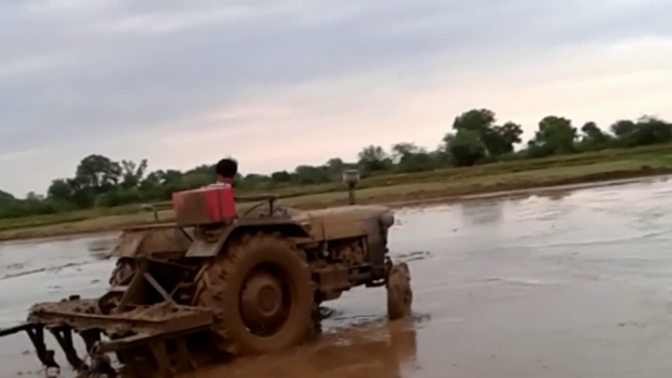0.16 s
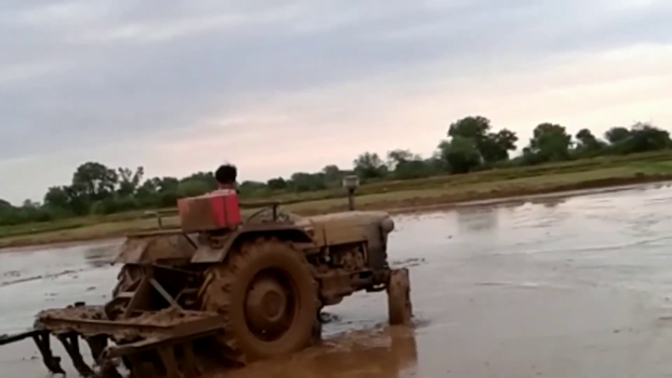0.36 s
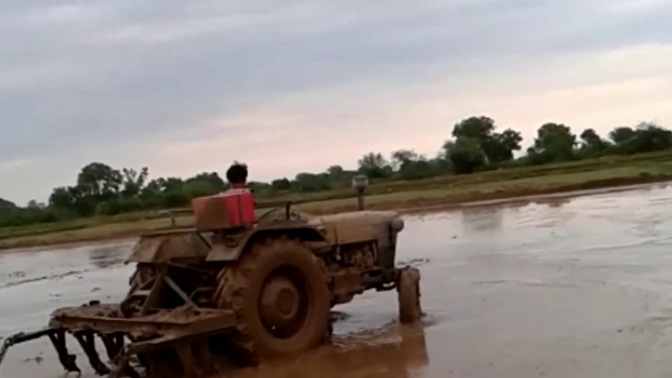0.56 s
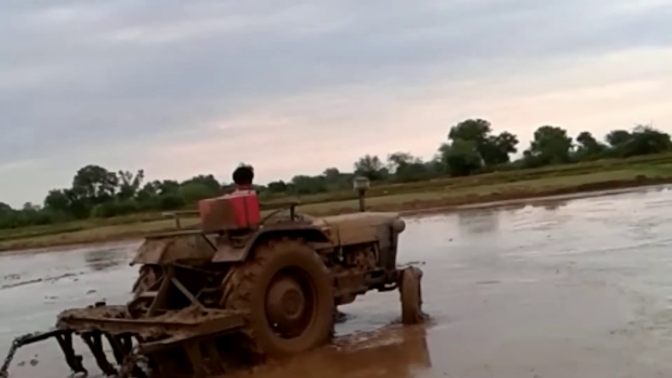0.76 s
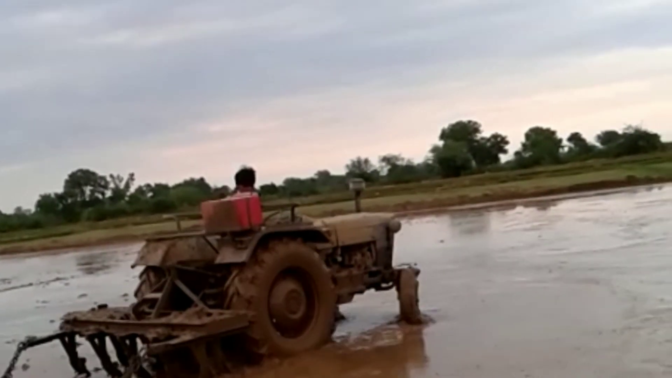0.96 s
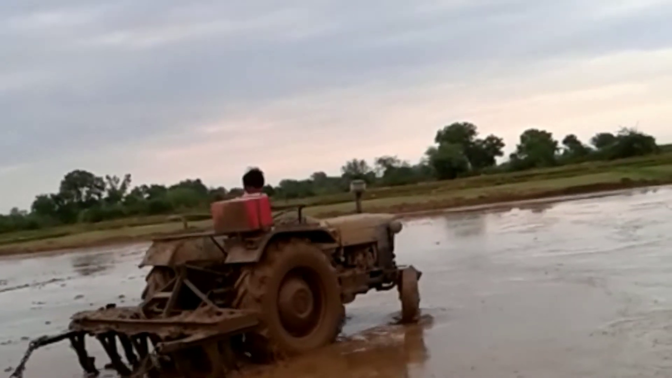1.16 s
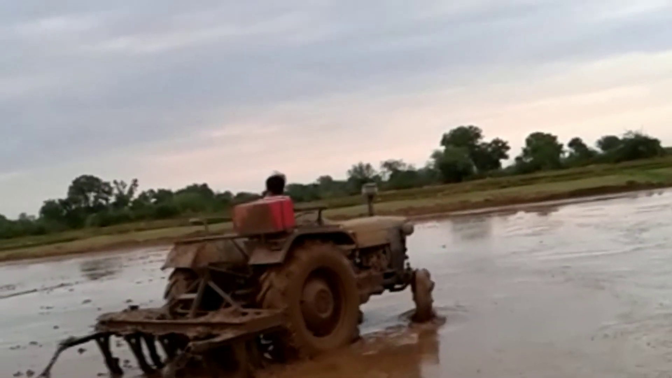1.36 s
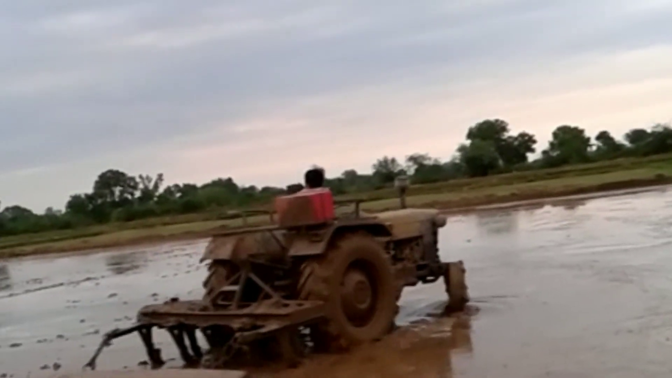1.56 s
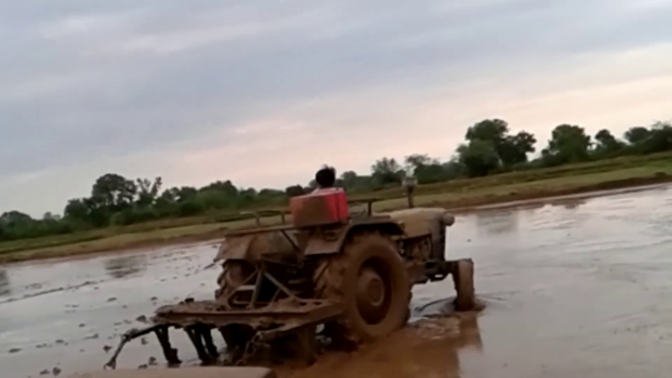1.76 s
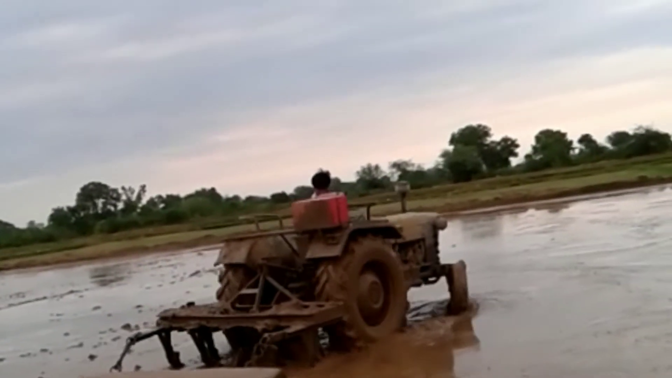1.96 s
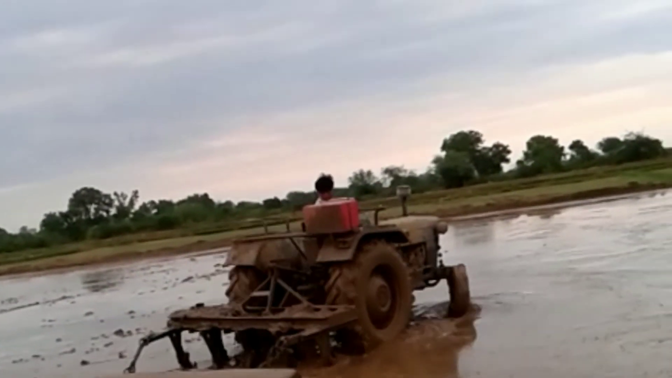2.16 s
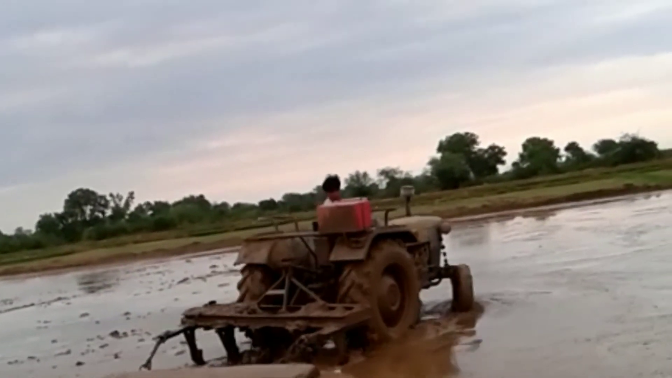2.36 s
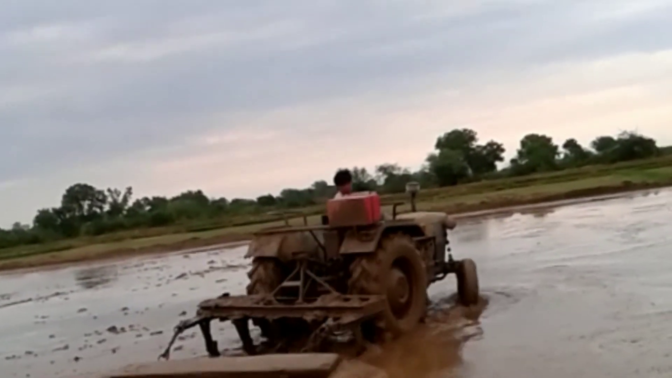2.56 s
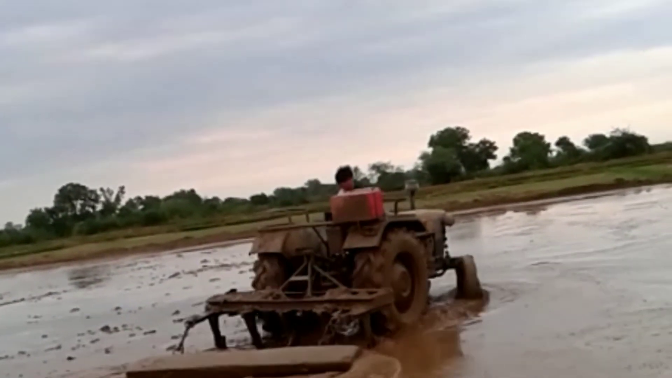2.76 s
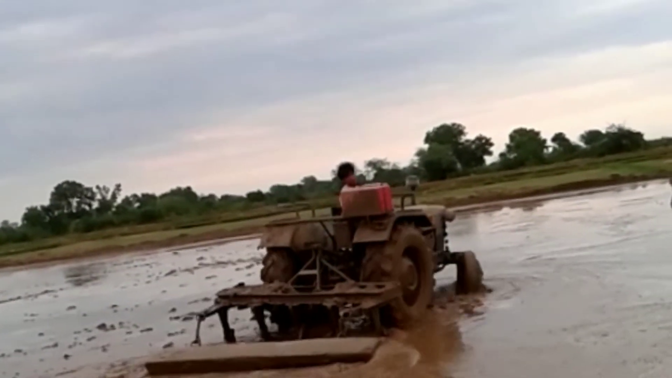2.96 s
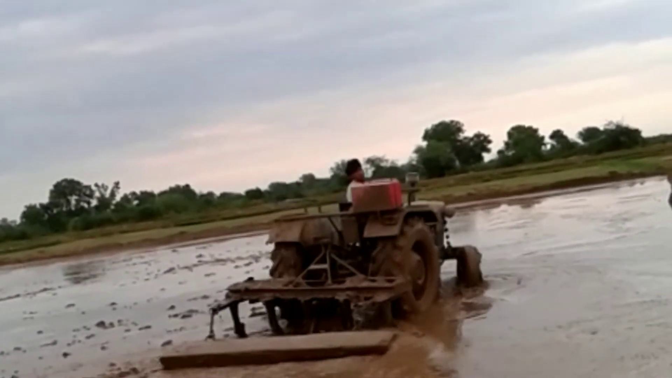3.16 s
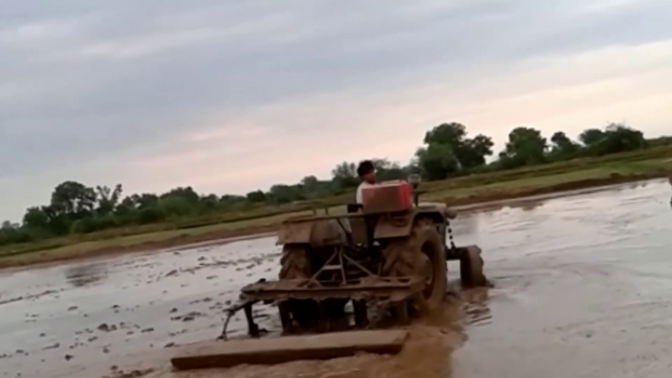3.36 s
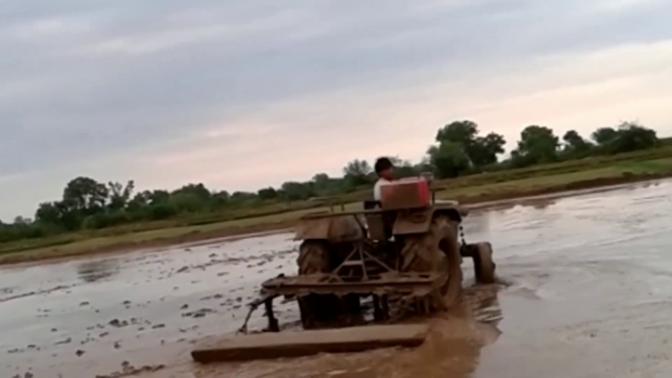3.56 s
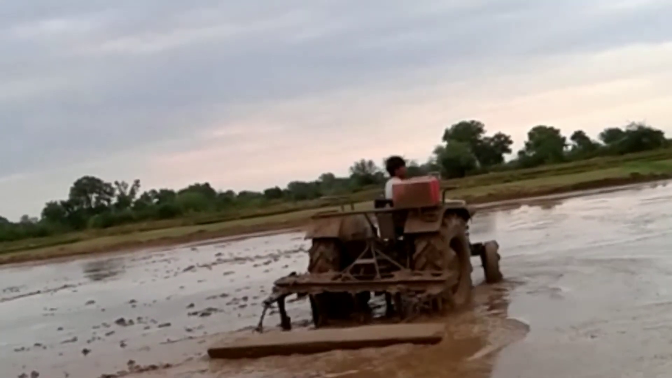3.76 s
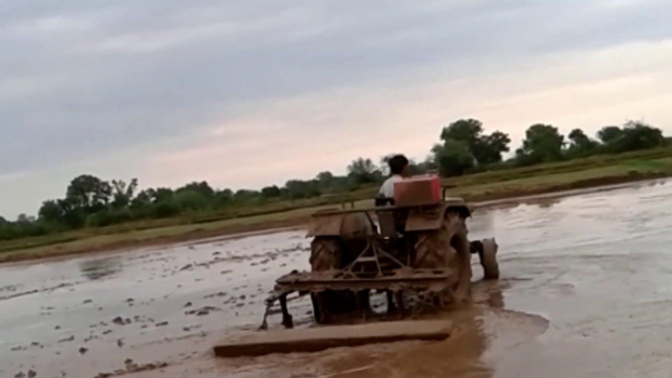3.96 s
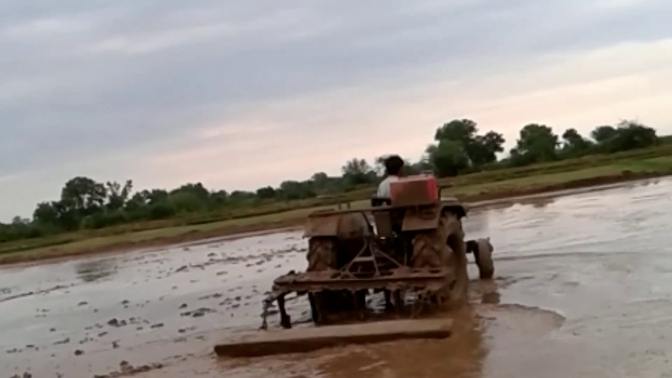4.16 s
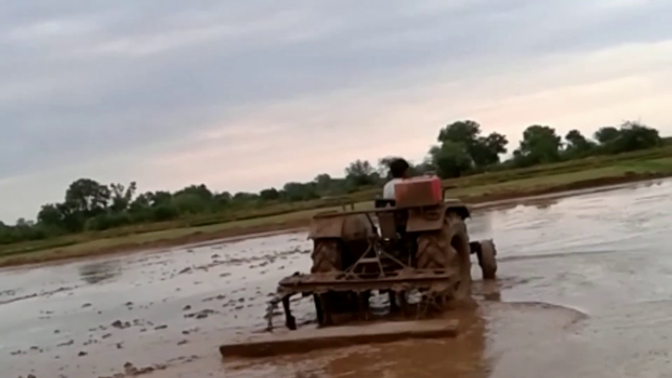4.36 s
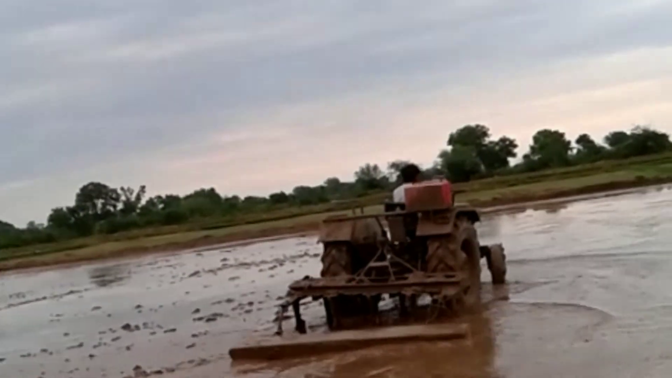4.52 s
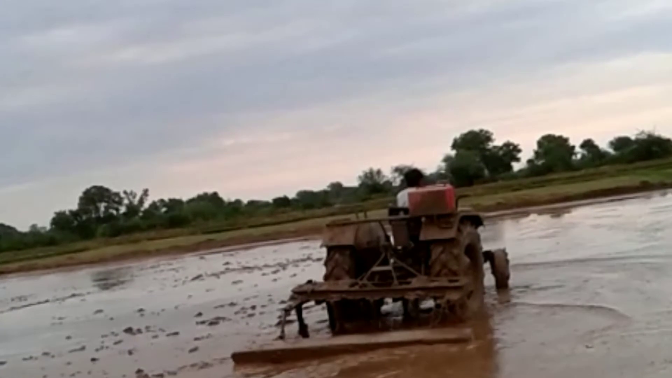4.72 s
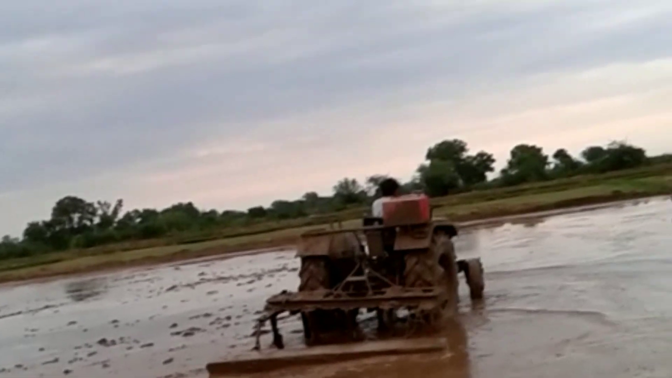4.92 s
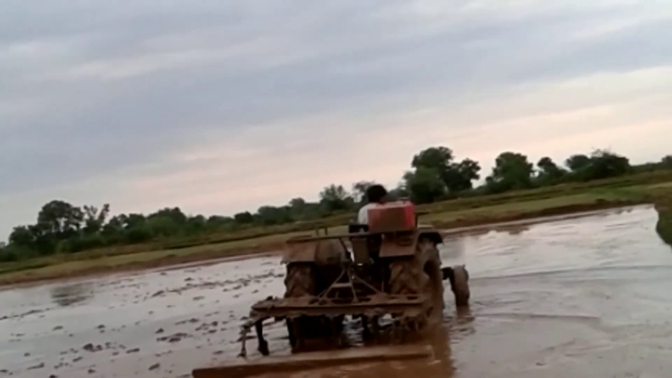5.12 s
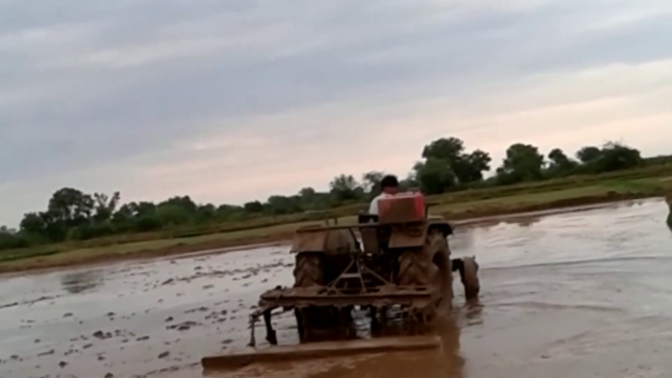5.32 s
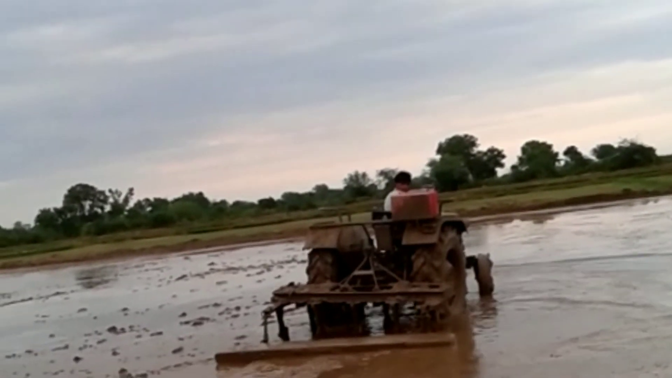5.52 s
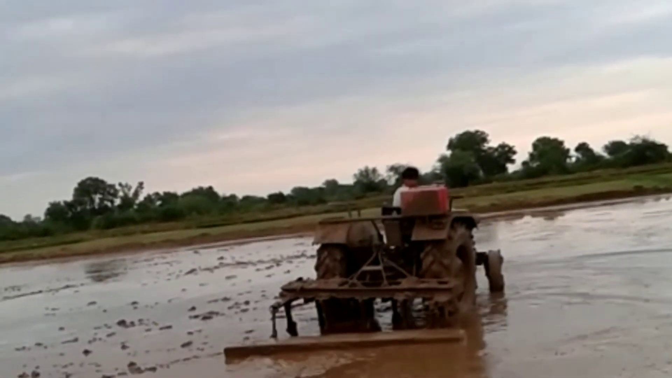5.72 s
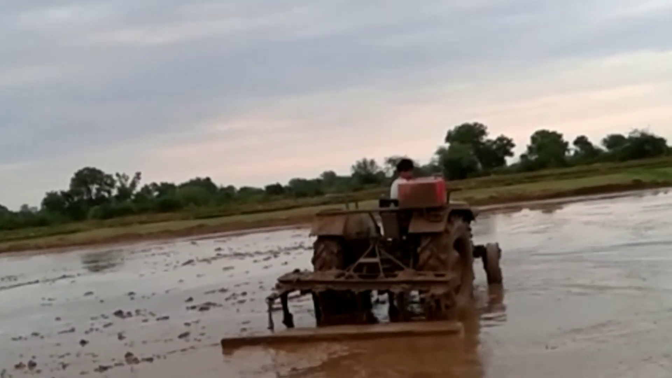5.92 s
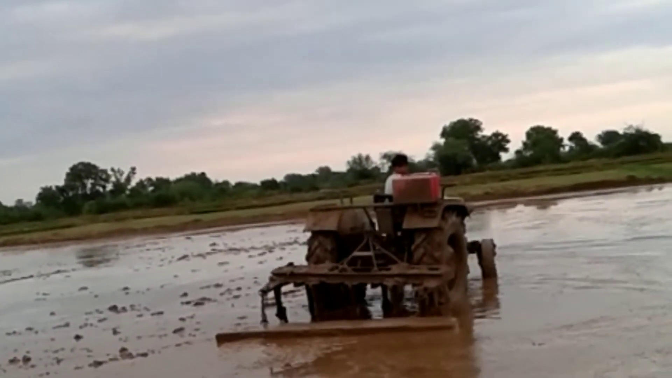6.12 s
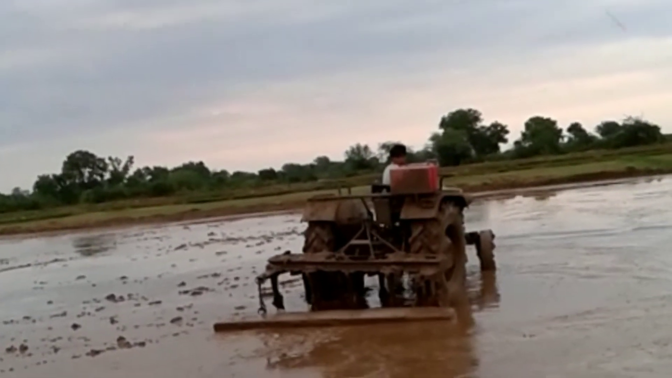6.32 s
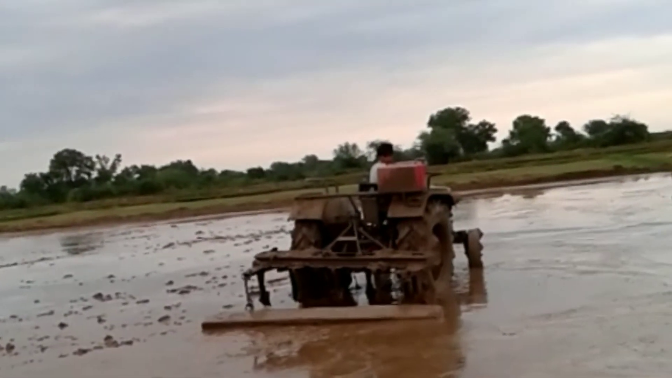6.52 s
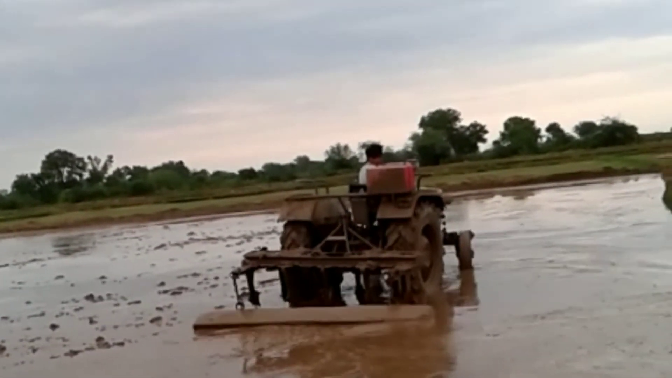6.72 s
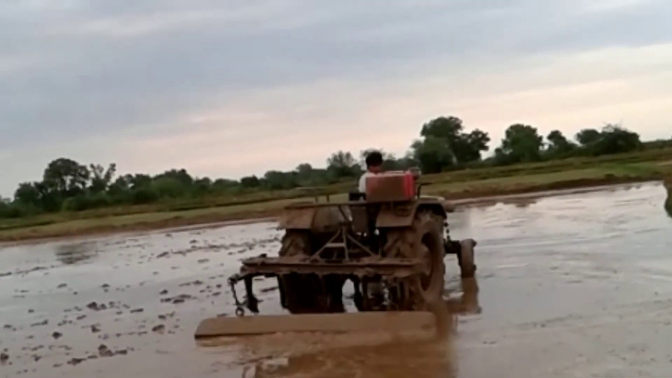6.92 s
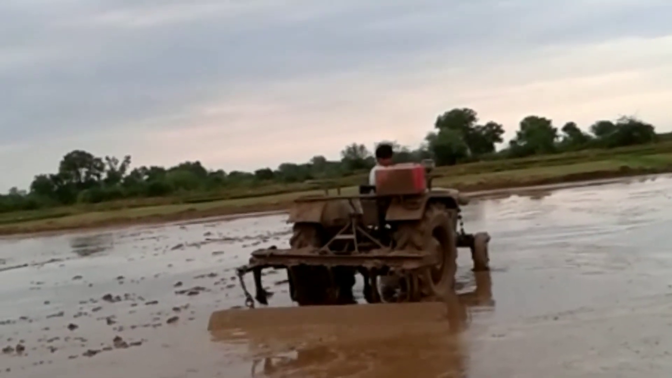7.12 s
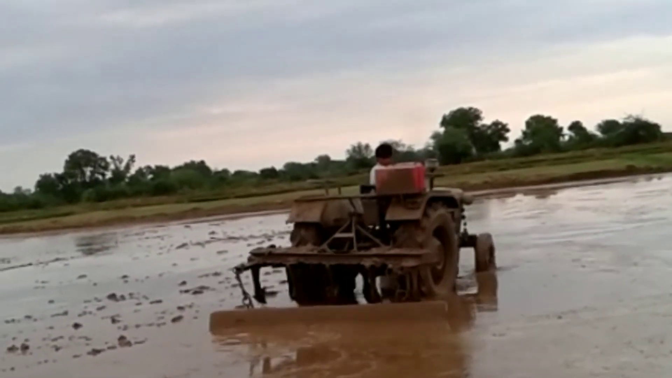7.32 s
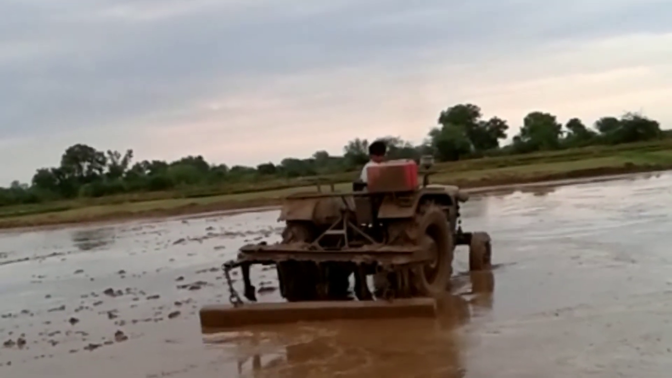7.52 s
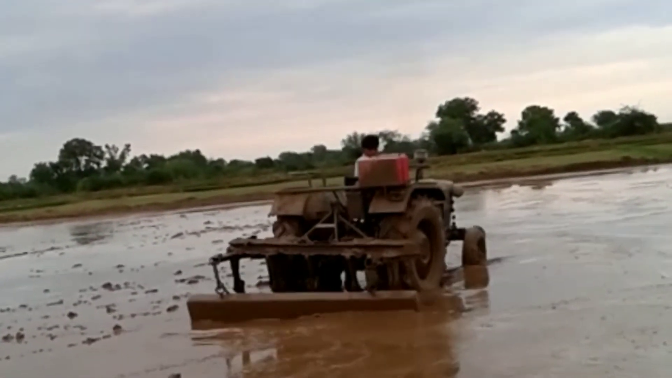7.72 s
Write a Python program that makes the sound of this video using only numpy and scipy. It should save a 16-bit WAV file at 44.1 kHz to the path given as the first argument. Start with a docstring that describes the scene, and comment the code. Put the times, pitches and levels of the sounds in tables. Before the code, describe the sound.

In an open flooded field, one microphone hears a three-cylinder diesel tractor close by. From 0 to 2.5 seconds it knocks hard and unevenly, about 29 beats a second, with deep exhaust thump, metallic clatter and a grainy hiss of muddy spray. A near cricket begins at about 1 second, giving shrill, falling chirps in short runs that become longer later. From 2.5 to 4.8 the tractor turns away: treble dulls, levels drop, knocks weaken and the beat rises to about 33. At 4.8 the throttle shuts; the engine coasts down with a soft drone and loose ticking, while small splashes fall near 4.9, 5.3 and 5.8. Around 6.6 it catches again, with slow, sharp knocks at about 16 a second, swelling near 7, dipping near 7.4 and strengthening to the end at 7.9. Faint low air and distant insects lie behind.

```python
"""Diesel tractor in a flooded field

One microphone in the open: a three-cylinder tractor drags a levelling board away; a cricket chirps close by.
Filtered noise bursts make the knocks: hard under load, then the engine speeds up as the load falls,
coasts down with the throttle shut and catches again in slow, sharp beats. Puffs through resonances make
the exhaust; random taps make the clatter and the muddy spray; gliding sine whistles make the cricket.
Low air and far insects, both filtered noise, lie behind."""
import sys
import numpy as np
from scipy import signal
from scipy.fft import rfft, irfft
from scipy.io import wavfile
from scipy.ndimage import uniform_filter1d

SR = 44100
rng = np.random.default_rng(int(sys.argv[2]) if len(sys.argv) > 2 else 0)


def persist_wave(psi):
    """Save psi, clipped to +-1, as 16-bit WAV."""
    counts = np.round(np.clip(psi, -1, 1) * 32767).astype(np.int16)
    wavfile.write(sys.argv[1], SR, np.atleast_2d(counts).T)


N = 347493
TIME = np.arange(N) / SR


def from_db(db):
    """Decibels to gain."""
    return 10 ** (np.asarray(db) / 20)


def rms_one(x):
    """Scale each row to rms 1."""
    return x / np.sqrt(np.mean(x ** 2, axis=-1, keepdims=True) + 1e-20)


def even_level(x):
    """Hold the short-term rms near 1 whatever the firing rate."""
    power = uniform_filter1d(uniform_filter1d(x ** 2, SR // 4), SR // 8)
    return x / np.sqrt(power + 1e-12)


def in_time(rows):
    """Interpolate the columns of a curve at every sample."""
    times, *columns = np.transpose(rows)
    return [np.interp(TIME, times, column) for column in columns]


def ramp(t, start_s, takes_s):
    """A change from 0 to 1."""
    return np.clip((t - start_s) / takes_s, 0, 1)


def wander(per_s):
    """Random drift, straight between normal draws of spread 1."""
    knots = rng.standard_normal(int(per_s * N / SR) + 2)
    return np.interp(TIME, np.linspace(0, N / SR, len(knots)), knots)


def resonate(x, hz, width):
    """A steep-sided resonance with gain 1 on top."""
    edges = np.clip([hz - width / 2, hz + width / 2], 10, .45 * SR)
    band = signal.butter(2, edges, "band", fs=SR, output="sos")
    return signal.sosfilt(band, x + 1e-18)


def place(times, sounds):
    """Lay short sounds on the time line."""
    out = np.zeros(N)
    for s, sound in zip(times, sounds):
        at = int(np.clip(s * SR, 0, N - 1))
        out[at:at + len(sound)] += sound[:N - at]
    return out


def impacts(per_s, spread_db):
    """Small contacts at random times, of uneven size and either sign."""
    chance = rng.random((int(per_s * N / SR), 3))
    size_db = spread_db * np.minimum(-np.log(1 - chance[:, 1]), 4)
    sizes = from_db(size_db) * np.sign(chance[:, 2] - .5)
    return np.bincount((chance[:, 0] * N).astype(int), sizes, N)


def low_air(hz):
    """Moving air rumbles faintly under everything: noise below a cutoff."""
    low_pass = signal.butter(2, hz, fs=SR, output="sos")
    return rms_one(signal.sosfilt(low_pass, rng.standard_normal(N)))


def far_insects(hz, width):
    """Many distant crickets blur into one shrill band of noise."""
    return rms_one(resonate(rng.standard_normal(N), hz, width))


# the near cricket sings in runs of evenly spaced chirps: first chirp t/s, last chirp t/s
CHIRP_RUNS = [(1.082, 1.152), (1.305, 1.377), (2.259, 2.403), (2.655, 3.119), (3.241, 3.451),
              (3.602, 3.744), (3.876, 4.138), (4.3, 4.432), (4.618, 4.618), (4.73, 5.389), (5.511, 5.841),
              (5.977, 6.892), (6.967, 7.755)]
CHIRP_EVERY_S = .066


def cricket(start_hz, end_hz, stroke_s, gap_s, lead_s):
    """A lone wing stroke opens each run, then two a chirp; each whistle falls as the wing slows."""
    chirps = np.concatenate([np.linspace(first, last, round((last - first) / CHIRP_EVERY_S) + 1)
                             for first, last in CHIRP_RUNS])
    openers = [first - lead_s for first, last in CHIRP_RUNS]
    strokes = np.concatenate([chirps, chirps + gap_s, openers])
    chance = rng.standard_normal((len(strokes), 2))
    along = np.minimum(np.arange(SR // 50) / SR / stroke_s, 1)   # 0 to 1 through a stroke
    hz = (start_hz + (end_hz - start_hz) * along) * (1 + .009 * chance[:, :1])
    whistle = np.sin(2 * np.pi * (np.cumsum(hz, axis=1) / SR + chance[:, 1:]))
    return place(strokes, np.sin(np.pi * along) ** 2 * whistle)


# colour of the spray of muddy water: f/Hz, level/dB
SPRAY = [(3000, -9), (5000, -11), (6200, -6), (7000, 4.5), (8300, 1), (9000, 0.5), (9700, -2),
         (10500, -8.5), (12500, -11), (16000, -22)]


def spray(per_s, spread_db):
    """Fine drops from the wheels and tines merge into a grainy hiss."""
    hz, db = np.transpose(SPRAY)
    bins_hz = np.fft.rfftfreq(N, 1 / SR)
    colour = from_db(np.interp(np.log(bins_hz + 1), np.log(hz), db, left=-90))
    return rms_one(irfft(rfft(impacts(per_s, spread_db)) * colour, N))


# louder splashes behind the wheels: t/s, length/s, level over the spray/dB
SPLASHES = [(4.866, .01, 10), (5.293, .077, 5), (5.822, .03, 5)]


def splashes():
    """Gain of the spray as clods fall back into the water."""
    return from_db(sum(db * np.exp(-((TIME - s) / length) ** 2) for s, length, db in SPLASHES))


def thin_whistle(hz, width):
    """A faint high tone, a little rough: very narrow noise."""
    return rms_one(resonate(rng.standard_normal(N), hz, width))


SLACK_FUEL_DB, SLACK_RANGE_DB = -31, 7   # below this fuel supply the gears run slack, fully so 7 dB lower


def gear_slap(cycle, at, width, hz, width_hz):
    """With little load the gears slap once a firing cycle and ring a resonance of the casing."""
    stroke = np.exp(-((cycle % 1 - at) / width) ** 2)
    return rms_one(resonate(stroke * rng.standard_normal(N), hz, width_hz))


def throb(cycle, depth_db, peak_at):
    """Clatter swells twice a firing cycle, in dB."""
    return depth_db * np.cos(4 * np.pi * (cycle - peak_at))


def clack(cycle, db, at, width):
    """The valve gear clacks once between firings, in dB."""
    return db * np.exp(-((cycle % 1 - at) / width) ** 2)


# resonances of the tractor's frame, engine casing and sheet metal: f/Hz, width/Hz, level/dB
FRAME = [(138, 112, -2), (269, 112, 0.5), (349.7, 53, -1), (416, 29.5, -3.5), (532, 260, -14)]
CASING = [(715, 212, -3.5), (869, 197, 1), (1046, 140, -4), (1337, 223, -5), (1586, 285, 0),
          (1876, 274, -3)]
SHEET_METAL = [(2331, 373, 4), (2576, 200, 1), (3072, 540, -6), (4150, 1400, -17), (6460, 2500, -13.5)]
TICK_SPEED = 20   # firings per s; the valve ticks stand out as the engine slows to this
RUMBLE_FOLLOWS = 0.66   # share of the clatter's swing that reaches the frame


def clatter(modes, force_db, per_s, spread_db):
    """Valves, gears and loose parts tap the resonances of a body."""
    force = from_db(force_db)
    return even_level(sum(from_db(db) * resonate(force * impacts(per_s, spread_db), hz, width)
                          for hz, width, db in modes))


# resonances of the air intake: f/Hz, width/Hz, level/dB
INTAKE = [(77, 18, -2.5), (101.6, 9.3, -1), (151, 36, 1)]


def drone(cycle, speed, waver_db, lag, dispersion):
    """Engine orders swell one after another as they slide through the air intake's resonances."""
    out = 0
    for order in range(3, 8):
        gain = sum(from_db(db) * np.exp(-((order * speed - hz) / width) ** 2) for hz, width, db in INTAKE)
        # the resonances delay each order differently, smearing the strokes into a drone
        turns = order * (cycle - lag) + dispersion * order ** 2
        out = out + gain / order * from_db(waver_db * wander(7.2)) * np.sin(2 * np.pi * turns)
    return even_level(out)


# resonances of the exhaust silencer: f/Hz, width/Hz, level/dB
SILENCER = [(66, 7, -9), (83.2, 18, 1.5), (110.2, 28, -3), (154.8, 23, -0.5), (204, 64, -5), (281, 89, -29)]


def exhaust(firings, lag_s, puff_s, low_cut_hz):
    """Each firing sends a smooth puff through the silencer's resonances."""
    t = np.arange(SR // 100) / SR
    puff = -np.exp(-.5 * ((t - lag_s) / puff_s) ** 2)
    puffs = place(firings, [puff] * len(firings))
    out = 0
    for hz, width, db in SILENCER:
        r = np.exp(-np.pi * width / SR)   # decay per sample of a two-pole resonance
        poles = [1, -2 * r * np.cos(2 * np.pi * hz / SR), r * r]
        out = out + from_db(db) * signal.lfilter([1 - r, 0, r - 1], poles, puffs)
    low_cut = signal.butter(4, low_cut_hz, "high", fs=SR, output="sos")
    return even_level(signal.sosfilt(low_cut, out))


# fuel supply as the strength of a knock; the governor hunts once the engine catches: t/s, level/dB
FUEL = [(0, -14), (1.85, -15), (2.7, -18.5), (3.7, -28.5), (5.1, -53), (6.54, -46), (6.66, -26),
        (6.78, -19), (7.0, -11.5), (7.2, -13.5), (7.44, -19), (7.68, -11), (7.88, -10.5)]
# the cylinders fire in turn, each with its own knock: ring level/dB, treble level/dB
CYLINDERS = [(2, 1.5), (0.5, -0.5), (-2.5, 0.5)]
# a few knocks with their own level and pitch: t/s, level change from the beat/dB, strongest ring f/Hz
PICKED_KNOCKS = [(.113, 2.5, 2120), (.463, 4, 2020), (.567, 2, 2930), (.74, 0.5, 2640), (1.045, 1.5, 2160),
                 (1.457, 3, 2340), (1.866, 0.5, 2200), (3.359, 4.5, 2530), (6.842, -0.5, 2940),
                 (7.026, -2, 3200), (7.321, 3.5, 2380)]
RING_HZ, RING_SPREAD_HZ = 2310, 170   # strongest ring of an ordinary knock
KNOCK_UNEVEN_DB = 1.3
TURN_S, TURN_TAKES_S, TURN_TREBLE_DB = 2.55, 0.84, -5.5   # the tractor turns its back, hiding engine treble


def knock_strengths(firings):
    """Fuel and cylinder set each knock; gives columns of ring dB, treble dB and strongest ring Hz."""
    chance = rng.standard_normal((len(firings), 3))
    fuel_db = np.interp(firings, *np.transpose(FUEL)) + KNOCK_UNEVEN_DB * chance[:, 0]
    ring_hz = RING_HZ + RING_SPREAD_HZ * chance[:, 1]
    for s, change_db, hz in PICKED_KNOCKS:
        nearest = np.abs(firings - s).argmin()
        fuel_db[nearest] += change_db
        ring_hz[nearest] = hz
    ring_db, treble_db = np.array(CYLINDERS)[np.arange(len(firings)) % len(CYLINDERS)].T
    turned_db = TURN_TREBLE_DB * ramp(firings, TURN_S, TURN_TAKES_S)
    treble_db = treble_db + turned_db + KNOCK_UNEVEN_DB * chance[:, 2]
    return np.array([fuel_db + ring_db, fuel_db + treble_db, ring_hz])[:, :, None]


# resonances that a knock rings in the engine, body and treble: f/Hz, width/Hz, level/dB
KNOCK_RING = [(220, 140, -8.5), (882, 413, -4), (1597, 410, -4), (2203, 250, 4.5), (2530, 190, 4),
              (2960, 275, 2.5), (3207, 365, 1.5), (4155, 520, -10.5), (4700, 165, -10)]
KNOCK_TREBLE = [(5960, 1170, -5.5), (7600, 1260, 5), (7970, 1040, 3), (8870, 540, 7.5), (9530, 780, 5.5),
                (11000, 4200, -8), (13800, 2600, -18)]
KNOCK_RISE_S, KNOCK_ACCENT_DB = .0015, 7


def knocks(firings, decay_s, treble_decay_s, tail_db, tail_s, ring_db, treble_db, ping_db, ping_s, variety_db):
    """Combustion bursts for a few ms and rings the engine at every firing, with a ping from the chamber's gas."""
    each_ring_db, each_treble_db, ring_hz = knock_strengths(firings)
    t = np.arange(SR // 16) / SR
    swell = 1 - np.exp(-(t / KNOCK_RISE_S) ** 2)

    def burst(fall_s):
        """Pressure noise swells, drops fast and leaves a longer shiver; its strength differs by resonance."""
        shape = swell * (np.exp(-t / fall_s) + from_db(tail_db) * np.exp(-t / tail_s))
        strength = from_db(variety_db * rng.standard_normal((len(firings), 1)))
        return strength * shape * rng.standard_normal((len(firings), len(t)))

    ring = 0
    for hz, width, level in KNOCK_RING:
        # each knock favours the resonances near its own pitch
        accent_db = KNOCK_ACCENT_DB * np.exp(-((hz - ring_hz) / 300) ** 2)
        ring = ring + from_db(level + accent_db) * resonate(burst(decay_s), hz, width)
    ping = swell * np.exp(-t / ping_s) * np.sin(2 * np.pi * ring_hz * t)
    ring = rms_one(rms_one(ring) + from_db(ping_db) * rms_one(ping))
    treble = rms_one(sum(from_db(level) * resonate(burst(treble_decay_s), hz, width)
                         for hz, width, level in KNOCK_TREBLE))
    return place(firings, from_db(ring_db + each_ring_db) * ring + from_db(treble_db + each_treble_db) * treble)


# engine speed: t/s, firing rate f/Hz
SPEED = [(0, 29.087), (.37, 28.719), (.9, 29.468), (1.99, 28.761), (2.78, 30.35), (3.69, 33.364),
         (4.85, 33.505), (5.9, 22.72), (6.44, 18.3), (6.82, 15.693), (7.22, 17.446), (7.59, 16.21),
         (7.88, 16.982)]
FIRST_FIRING = .355   # share of a firing cycle before the first one
SHUT_S, SHUT_TAKES_S, OPEN_S, OPEN_TAKES_S = 4.8, .06, 6.55, .25   # the throttle shuts and opens again
SHUT_PUFFS_DB = -12   # the exhaust puffs fade while it is shut


def engine(thump_db, clatter_db):
    """One crankshaft times the exhaust, the knocks and the clatter of frame, casing and sheet metal."""
    speed, = in_time(SPEED)
    cycle = np.cumsum(speed) / SR - FIRST_FIRING
    firings = np.interp(np.arange(int(cycle[-1]) + 1), cycle, TIME)
    shut = ramp(TIME, SHUT_S, SHUT_TAKES_S) - ramp(TIME, OPEN_S, OPEN_TAKES_S)
    slack = np.clip((SLACK_FUEL_DB - in_time(FUEL)[0]) / SLACK_RANGE_DB, 0, 1)
    slow = (TICK_SPEED / speed) ** 2

    frame_force = slow * clack(cycle, db=2.5, at=.75, width=0.14)
    casing_force = throb(cycle, depth_db=1, peak_at=0.089) + slow * clack(cycle, db=3.5, at=0.36, width=0.16)
    sheet_force = throb(cycle, depth_db=1.0, peak_at=0.038) + slow * clack(cycle, db=5.5, at=0.47, width=0.1)
    frame = clatter(FRAME, frame_force, per_s=1500, spread_db=3.0)
    casing = clatter(CASING, casing_force, per_s=1800, spread_db=3)
    sheet = clatter(SHEET_METAL, sheet_force, per_s=2500, spread_db=2.5)
    slap = slack * (speed / speed.max()) ** 2 * gear_slap(cycle, at=.71, width=0.15, hz=827, width_hz=180)
    puffs = exhaust(firings, lag_s=0.0026, puff_s=.001, low_cut_hz=63.4)

    out = from_db(RUMBLE_FOLLOWS * clatter_db - 15.5) * frame
    out += from_db(clatter_db + 0.16) * casing
    out += from_db(clatter_db - 0.02) * sheet
    out += from_db(-44.0) * slap
    out += from_db(thump_db) * shut * drone(cycle, speed, waver_db=1.5, lag=.291, dispersion=.22)
    out += from_db(thump_db + SHUT_PUFFS_DB * shut + 2) * puffs
    out += knocks(firings, decay_s=0.0072, treble_decay_s=0.0059, tail_db=-22, tail_s=0.01, ring_db=-16,
                  treble_db=-18.5, ping_db=-6, ping_s=0.0052, variety_db=2.5)
    return out


# running levels before each layer's own offset: t/s, exhaust thump level/dB, clatter level/dB, spray level/dB
RUNNING = [(0.0, -33, -30.5, -37.5), (0.68, -33, -30, -38.5), (2.81, -33.5, -33, -43),
           (3.68, -40.5, -36.5, -47), (4.59, -43.5, -37.5, -47.5), (5.07, -41, -41, -52),
           (5.99, -48, -45, -54.5), (6.56, -47.5, -42.5, -53.5), (7.0, -37.5, -41, -47.5),
           (7.88, -40, -39.5, -47.5)]


def scene():
    """Engine, water and insects in the open, heard by one microphone."""
    thump_db, clatter_db, spray_db = in_time(RUNNING)
    air = from_db(thump_db - 24) * low_air(hz=55)
    insects = from_db(-45) * far_insects(hz=7700, width=760)
    insects += from_db(-26) * cricket(start_hz=8274, end_hz=6770, stroke_s=0.011, gap_s=.0208, lead_s=.05)
    water = from_db(spray_db + 4.5) * splashes() * spray(per_s=6000, spread_db=2.5)
    whistle = from_db(spray_db - 14) * thin_whistle(hz=5310, width=29)
    tractor = engine(thump_db, clatter_db) + whistle
    return np.tile(air + insects + water + tractor, (2, 1))   # same signal on both channels


def record(dry):
    """The top is cut steeply above 16 kHz."""
    return signal.sosfilt(signal.ellip(10, .2, 80, 16000, fs=SR, output="sos"), dry)


dry = scene()
out = record(dry)
persist_wave(out)
```